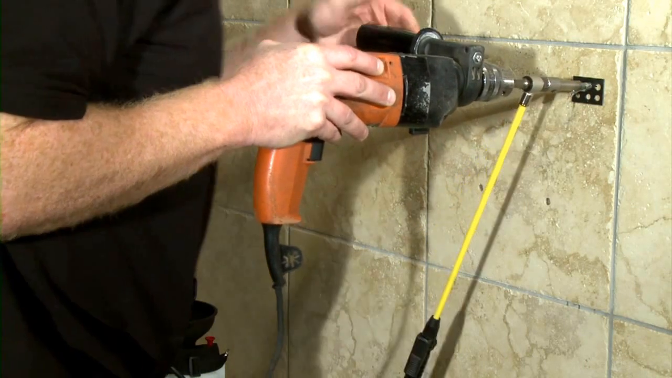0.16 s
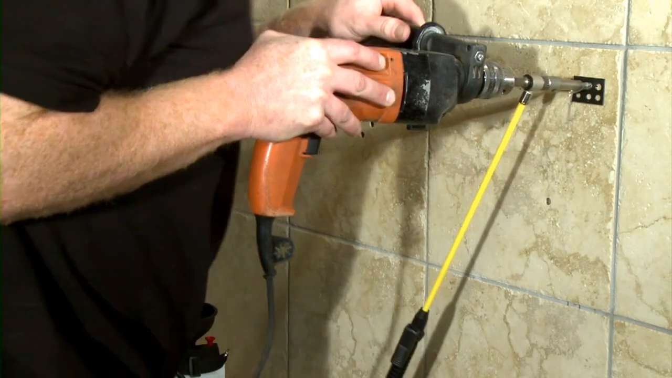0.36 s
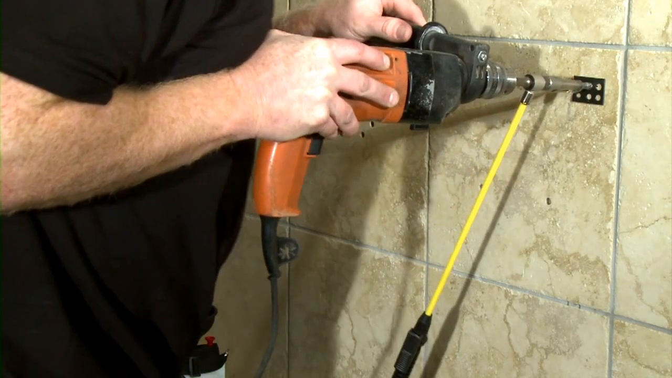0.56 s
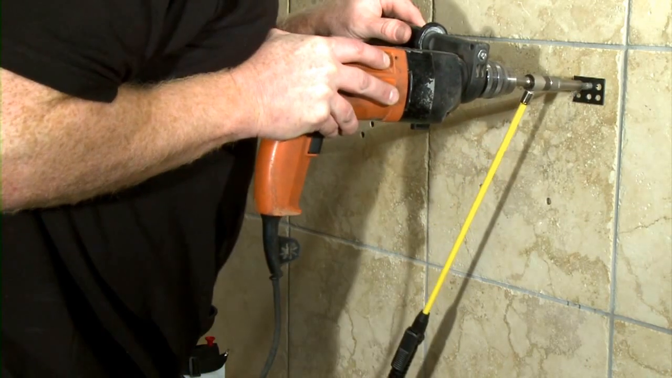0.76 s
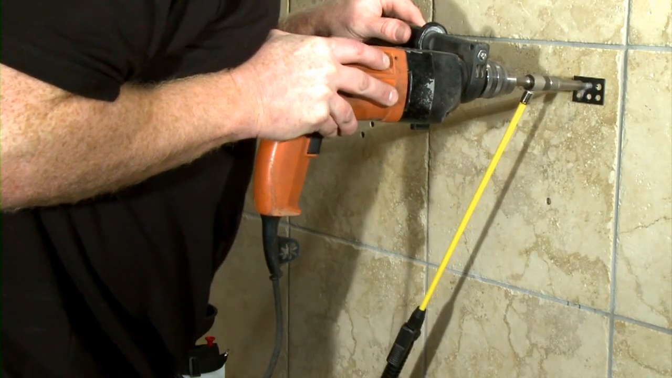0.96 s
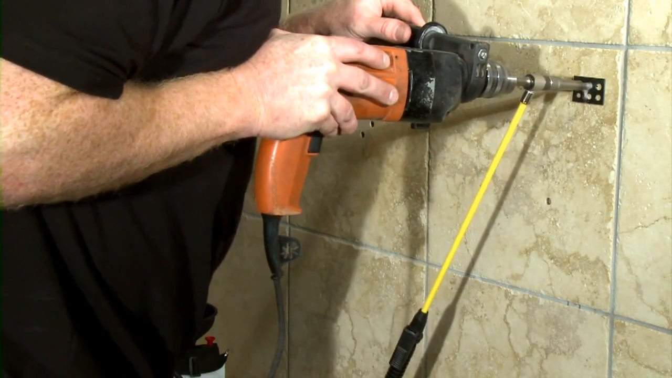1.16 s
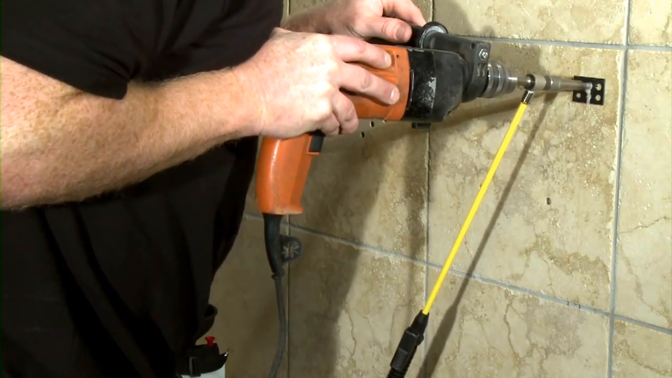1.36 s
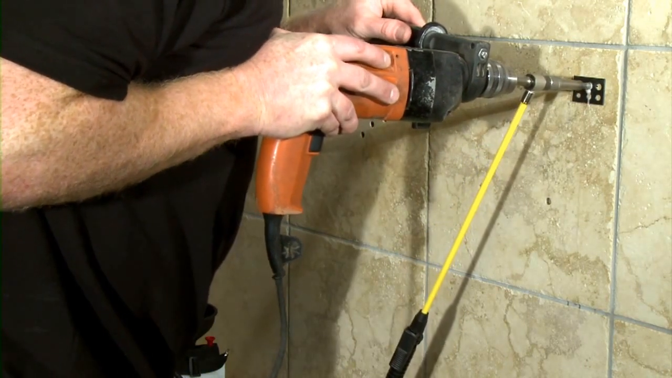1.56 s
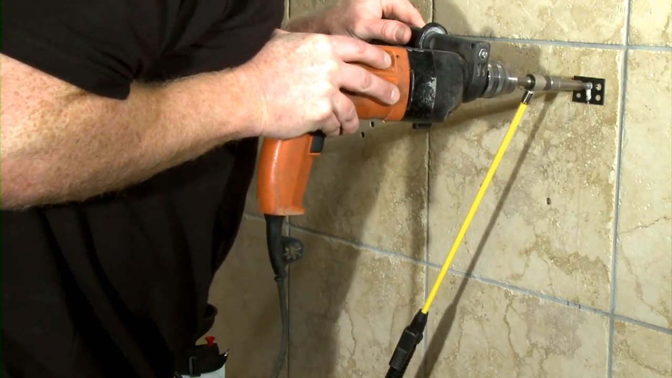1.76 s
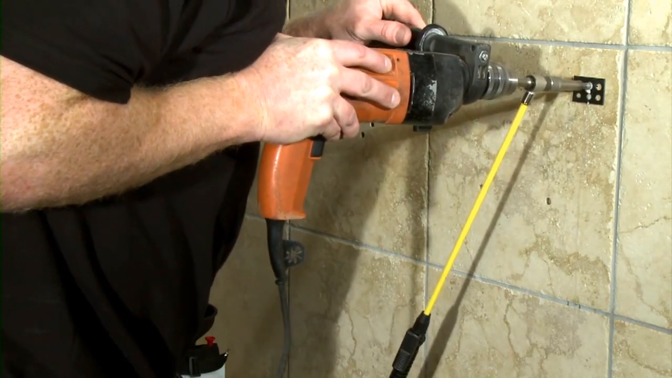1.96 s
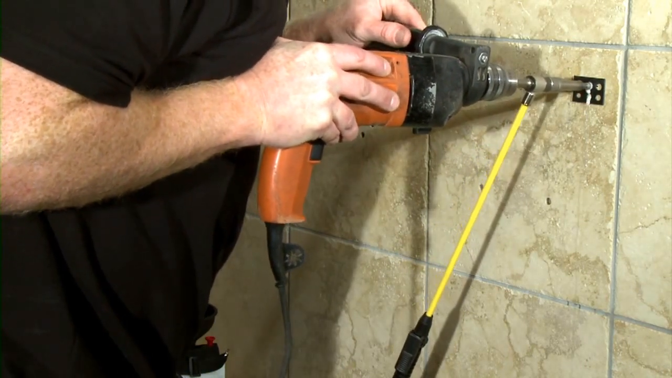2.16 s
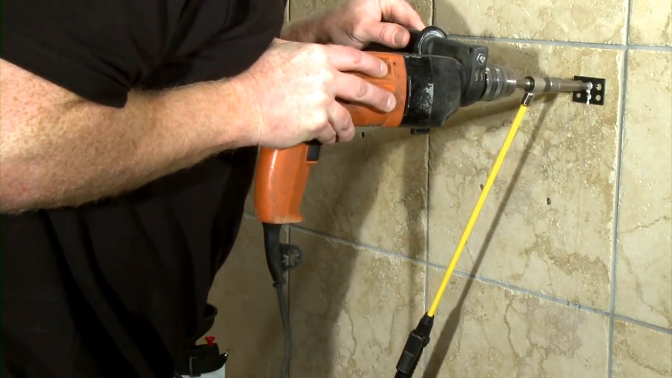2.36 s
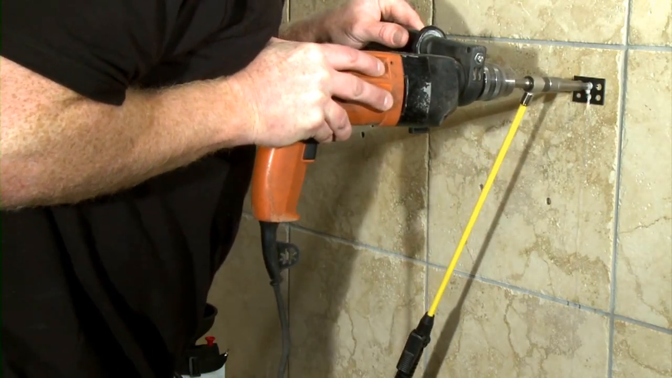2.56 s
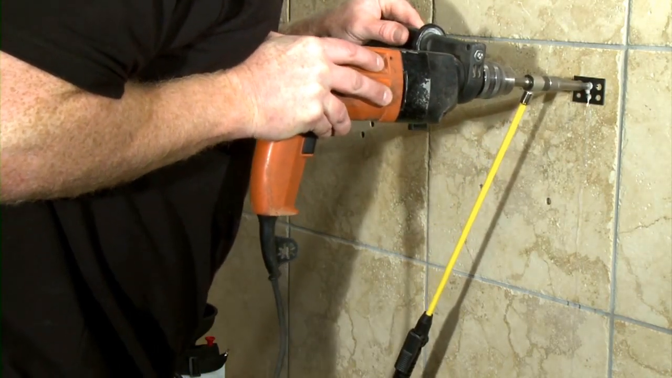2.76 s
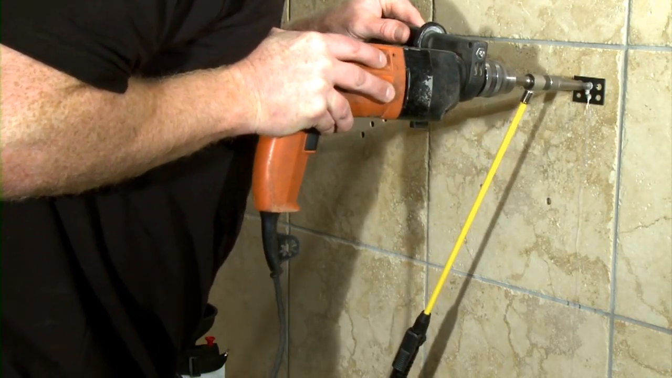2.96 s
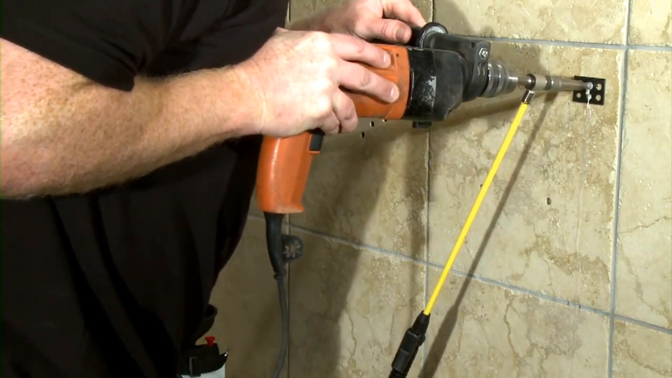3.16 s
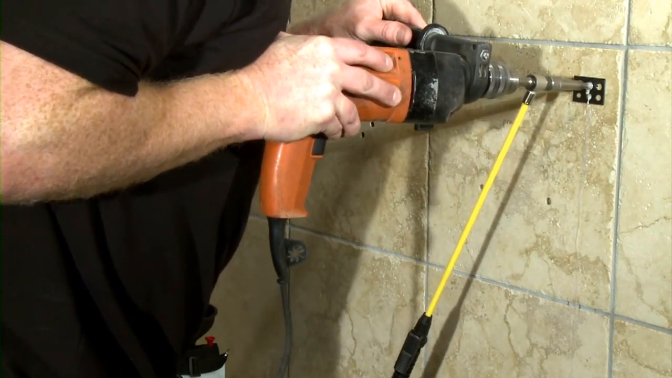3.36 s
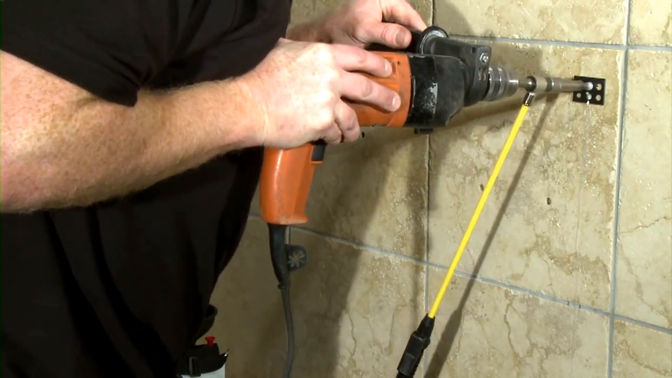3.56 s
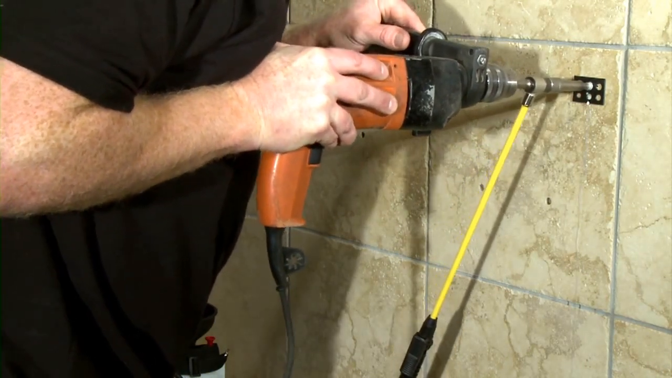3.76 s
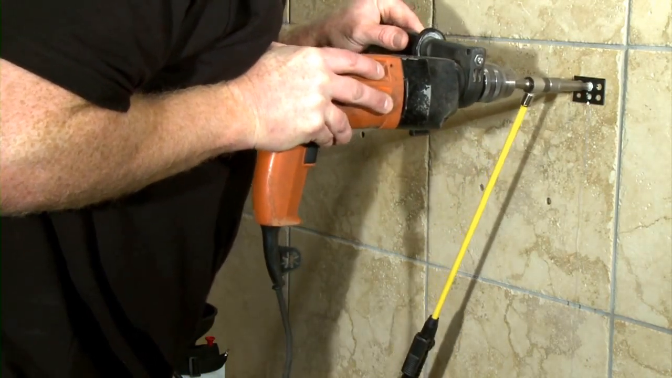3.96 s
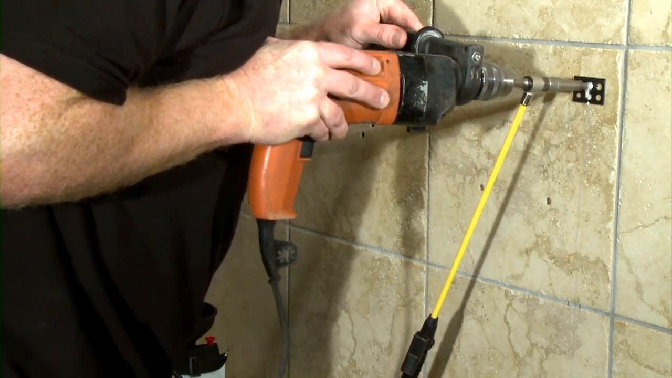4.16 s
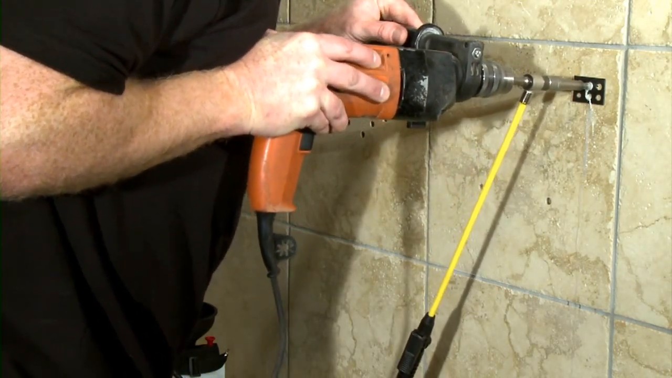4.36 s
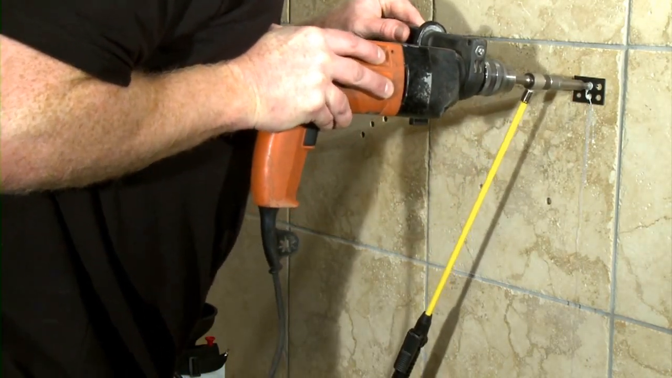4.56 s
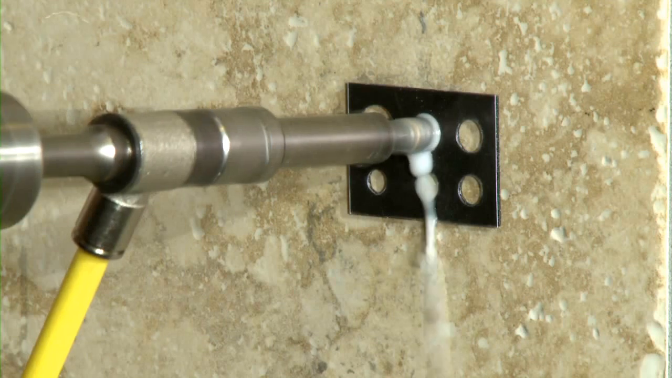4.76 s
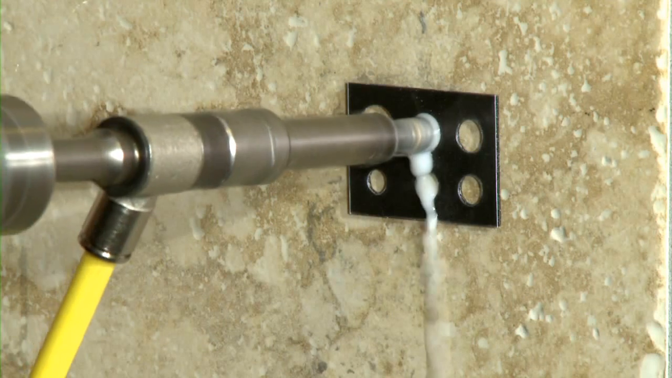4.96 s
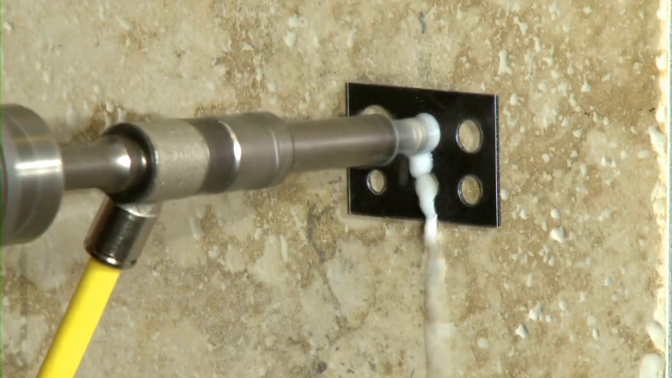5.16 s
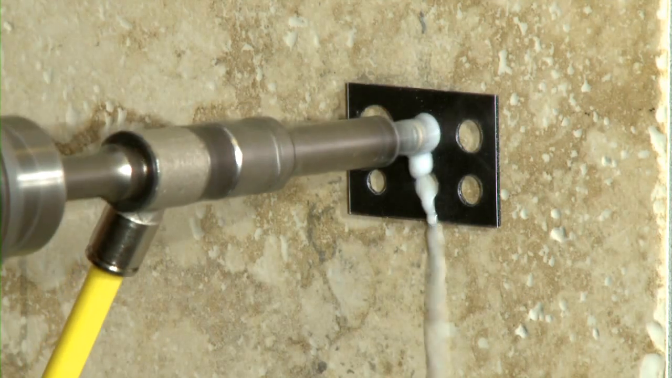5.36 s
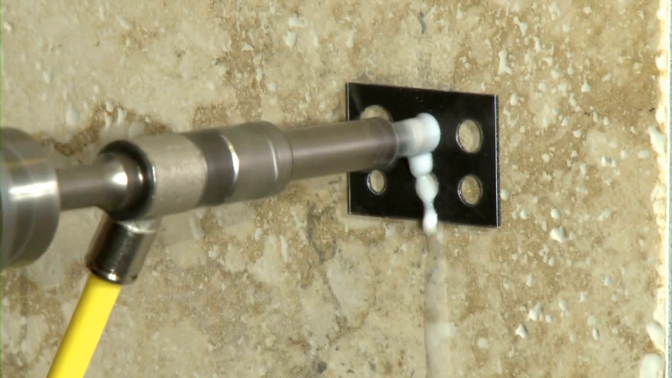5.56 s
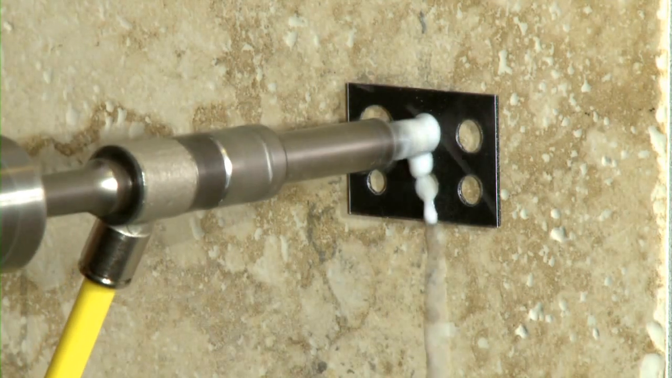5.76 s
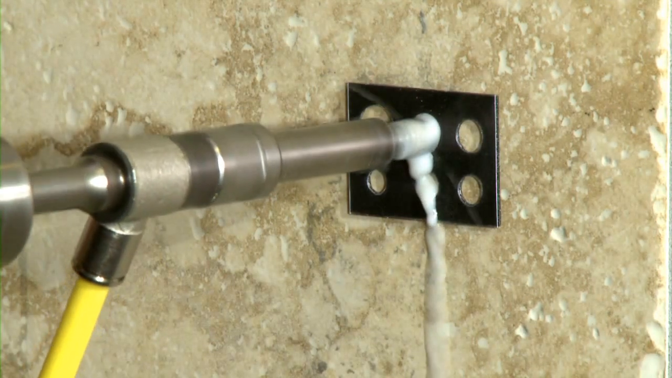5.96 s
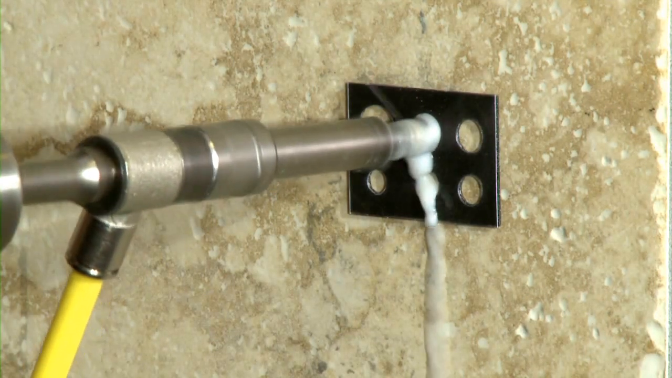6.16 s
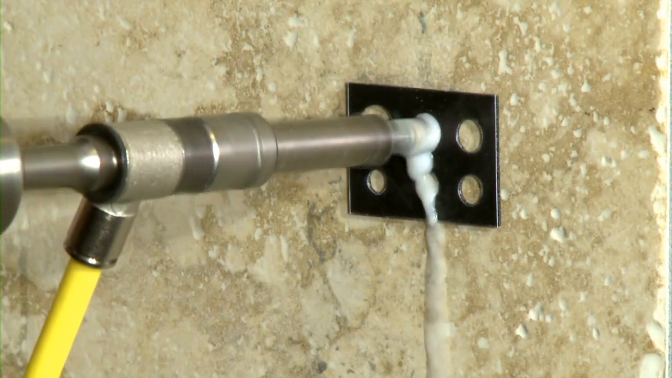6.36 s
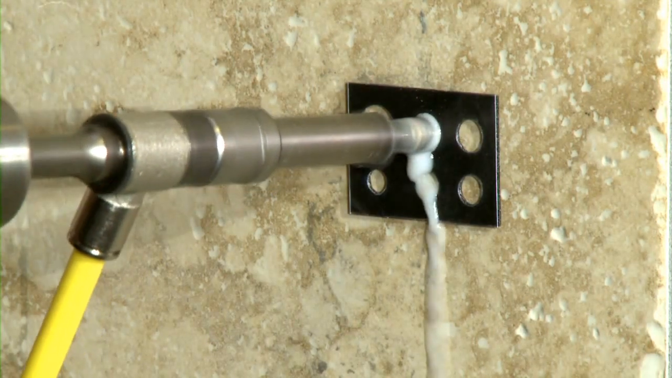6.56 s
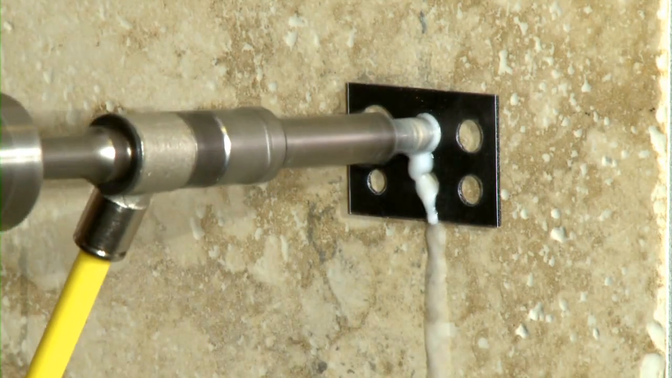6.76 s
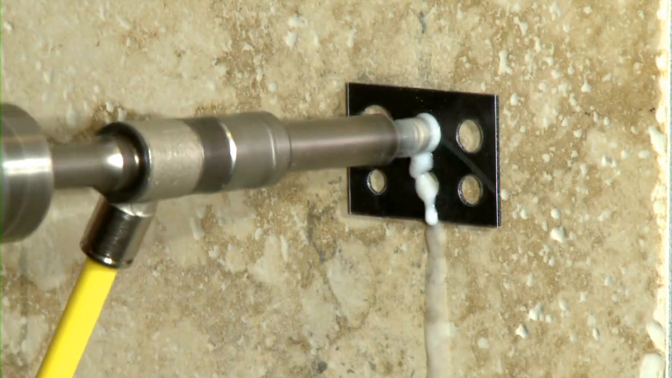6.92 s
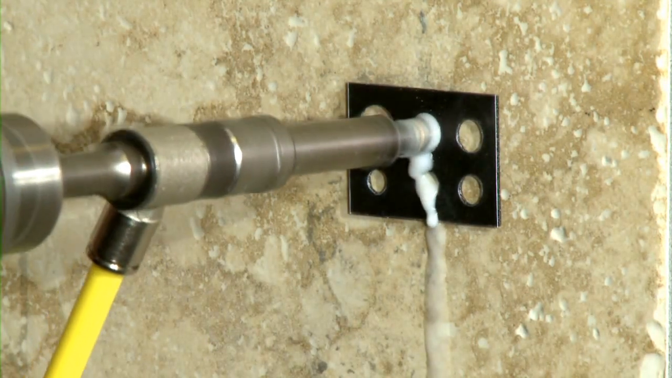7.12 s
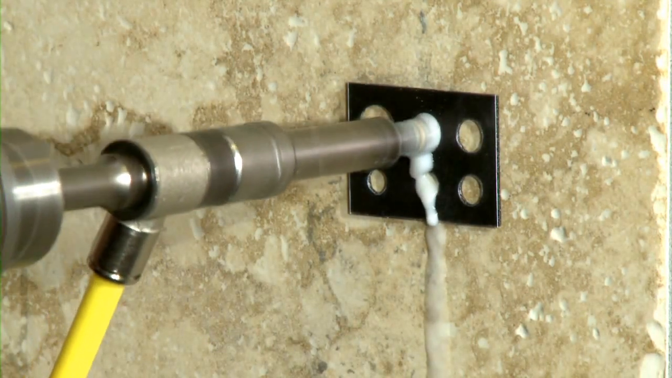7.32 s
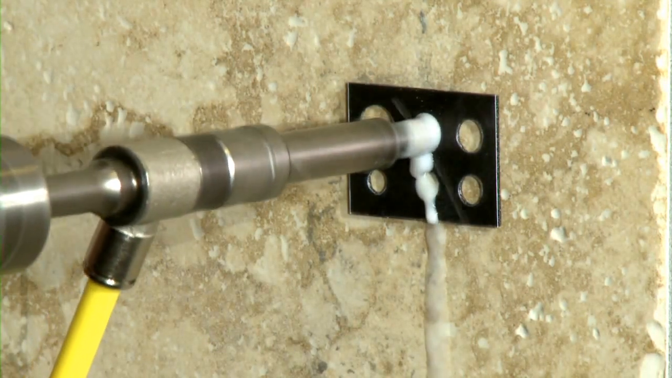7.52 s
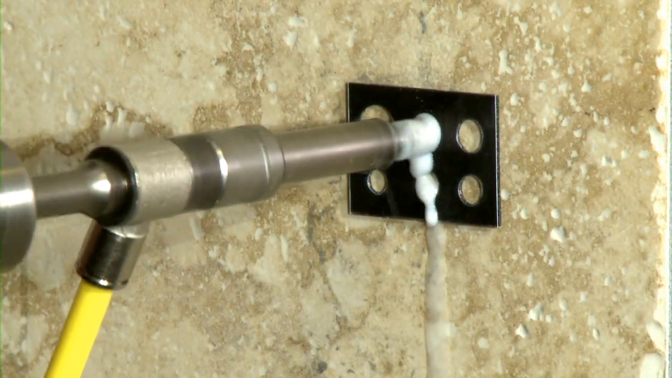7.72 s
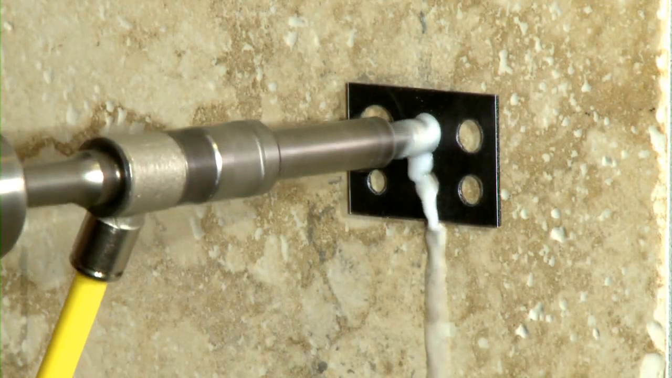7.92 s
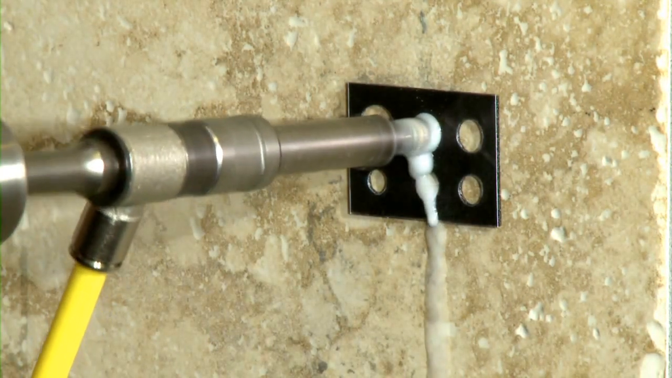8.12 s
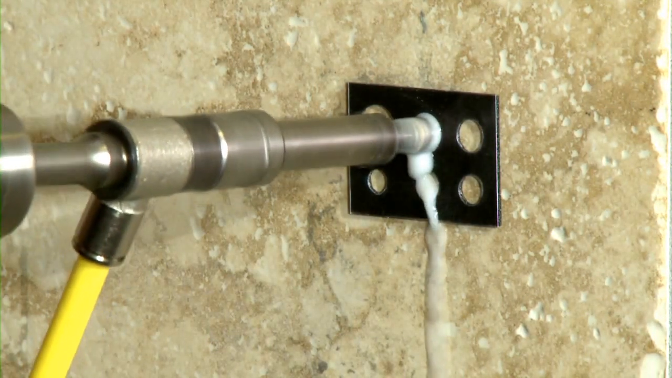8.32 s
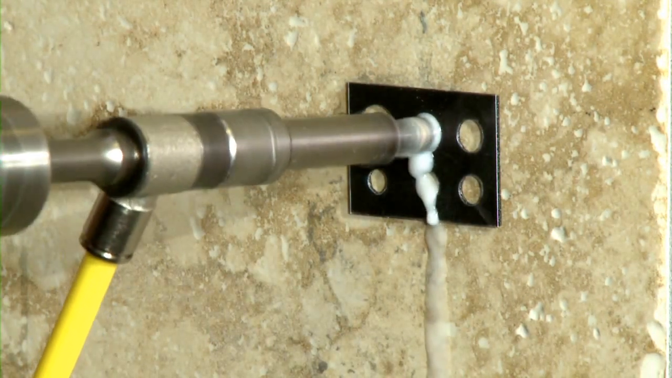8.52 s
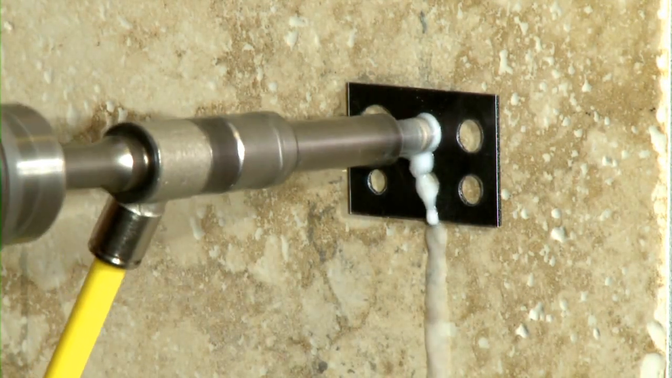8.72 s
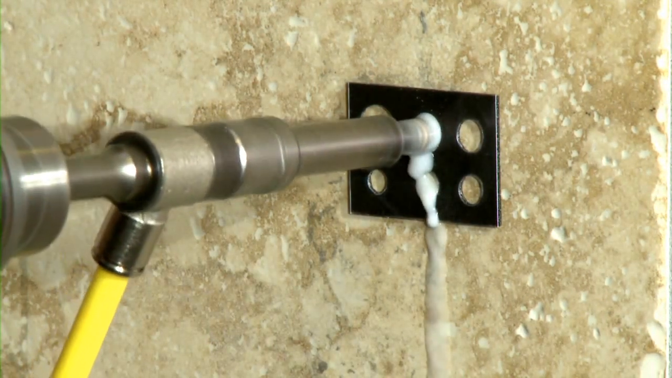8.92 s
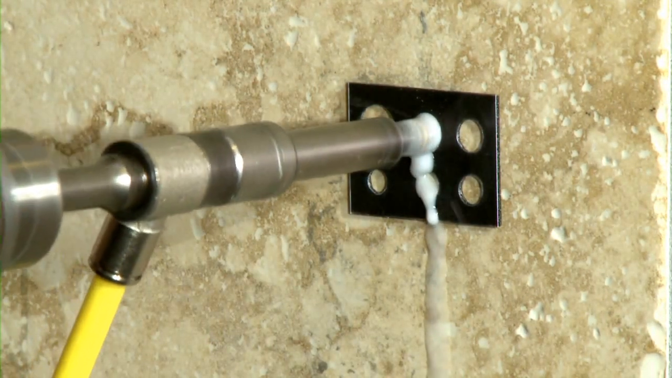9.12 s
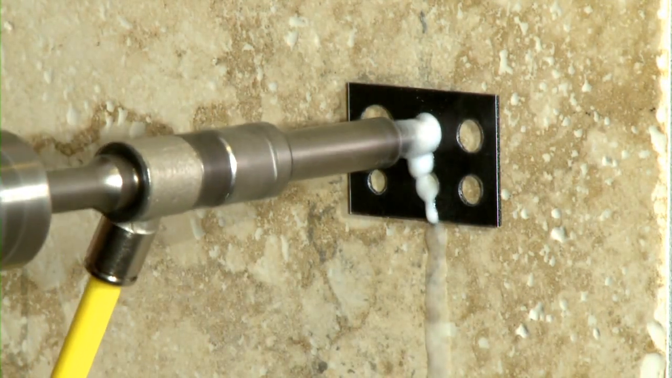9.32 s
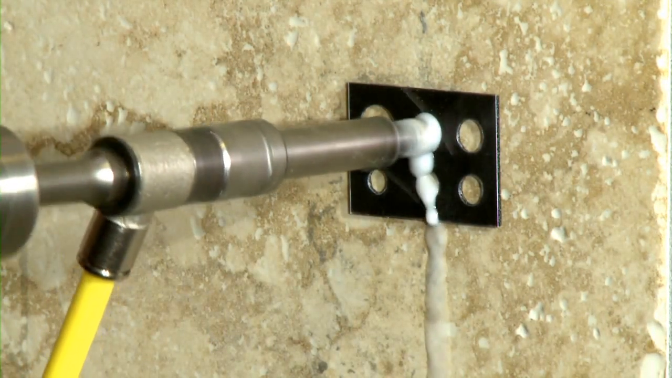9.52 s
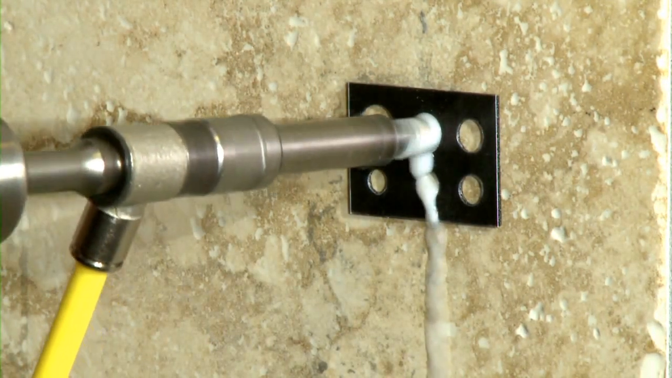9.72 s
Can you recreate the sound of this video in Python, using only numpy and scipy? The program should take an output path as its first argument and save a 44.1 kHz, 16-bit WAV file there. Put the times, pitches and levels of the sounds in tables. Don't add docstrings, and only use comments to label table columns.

```python
import sys
import numpy as np
from scipy import signal
from scipy.fft import rfft, irfft, next_fast_len
from scipy.io import wavfile
from scipy.ndimage import uniform_filter1d, map_coordinates

SR = 44100
rng = np.random.default_rng(int(sys.argv[2]) if len(sys.argv) > 2 else 0)


def wav_out(sig):
    wavfile.write(sys.argv[1], SR, np.round(np.clip(np.atleast_2d(sig).T, -1, 1) * 32767).astype(np.int16))


def makeup_ratio(level_db):
    decades = np.asarray(level_db, float) / 20
    return 10 ** decades


N = 436149

BLADES = 29
SPINDLE = 6 / 29
TRIGGER_S, FULL_SPEED = .64, 500


def unit(x):
    return x / np.sqrt(np.mean(x ** 2) + 1e-20)


def along(points, hz):
    f, v = np.transpose(points)
    return np.interp(np.log(hz + 1), np.log(f + 1), v)


def over_time(points):
    s, v = np.transpose(points)
    return np.interp(np.arange(N) / SR, s, v)


def wobble(rate):
    knots = rng.standard_normal(int(N * rate / SR) + 4)
    return map_coordinates(knots, [np.arange(N) * rate / SR])


def filtered(x, response):
    m = next_fast_len(N + 8192)
    return irfft(rfft(x, m) * response(np.fft.rfftfreq(m, 1 / SR)), m)[:N]


def bumps(modes, hz):
    return [(1 / (1 + (2 * (hz - c) / w) ** 2), db) for c, w, db in modes]


def running(start_s, fade_s=.014):
    return np.clip((np.arange(N) / SR - start_s) / fade_s, 0, 1)


def spin():
    # time in seconds, fan blade passes per second.
    run_up = [(0.62, 821.0), (0.7, 3100.0), (0.84, 4865.0), (1.2, 8956.0), (1.47, 11396.0), (1.65, 12185.0),
              (2.05, 13406.0), (2.55, 14222.0), (3.4, 14586.0), (4.0, 14540.0), (4.6, 14592.0),
              (5.2, 14530.0), (5.8, 14529.0), (6.2, 14492.0), (7.0, 14498.0), (7.8, 14465.0),
              (9.1, 14505.0), (9.89, 14535.0)]
    s, hz = np.transpose(run_up)
    slope = np.gradient(hz, s)
    place = np.interp(np.arange(N) / SR, s, np.arange(len(s)))
    i = np.minimum(place.astype(int), len(s) - 2)
    u = place - i
    bend = np.diff(s)[i] * u * (1 - u) * ((1 - u) * slope[i] - u * slope[i + 1])
    return (hz[i] + np.diff(hz)[i] * u * u * (3 - 2 * u) + bend) / BLADES


def whistle_db(speed):
    # peak time in seconds, level in dB, half length in seconds.
    swell_rows = [(1.042, -33, 0.11), (2.69, -26, .09), (3.073, -23.5, .09), (3.34, -27, 0.16),
                  (3.62, -31, .12), (3.87, -31, .12), (4.47, -33, .08), (4.67, -27, .08), (4.85, -29, .06),
                  (5.15, -24.5, .14), (5.42, -31, .07), (5.95, -22, 0.098), (6.2, -27, 0.18),
                  (6.68, -31, .12), (6.98, -31, .1), (7.25, -35, .08), (7.53, -22, .08), (7.77, -23, 0.12),
                  (8.117, -33, .14), (8.6, -31, .16), (8.93, -34, .05), (9.2, -23, .13), (9.42, -26, .12),
                  (9.88, -34, .07)]
    t = np.arange(N) / SR
    share = speed / FULL_SPEED
    climbing = np.clip((1 - share) * 30, 0, 1)
    gap_db = -42
    base = climbing * makeup_ratio(-30) * share ** 2.2 + (1 - climbing) * makeup_ratio(gap_db)
    swells = sum(makeup_ratio(db) * np.exp(-((t - s) / half) ** 2) for s, db, half in swell_rows)
    return 20 * np.log10(base + swells), climbing


def whine(turns, speed):
    # multiple of the turning speed, dB at full speed, power of speed by which
    # it grows, dB gained for each turn per second lost to load.
    strong = [(12 / 29, -59, 2, 0), (1, -39.5, 3.6, -1.8), (2, -54, 2, 0), (3, -35, 2.2, -1.1),
              (6, -37.5, 4, .9), (8, -36, 9, 0)]
    # multiple, dB at full speed, power of speed.
    weak = [(5, -53, 1), (6.414, -48, 4), (7, -41, 2), (7.414, -44, 8), (7.586, -40, 8), (8.586, -45, 4),
            (9.31, -36, 3), (12, -45, 1), (13, -46, 8), (18, -54, 4), (21, -55, 8), (23, -44, 8),
            (24, -53, 4), (26, -52, 2), (28, -53, 8), (30, -47, 3)]
    # multiple, centre in Hz, width in Hz, dB.
    crossed = [(1, 440, 50, 5), (1, 474, 18, -14), (2, 940, 110, 12), (3, 800, 300, -6), (3, 1140, 100, 2),
               (3, 1270, 50, -9)]
    bites_s, free_speed = 3.4, 503.2
    share = speed / FULL_SPEED

    def tone(k):
        return np.sqrt(2) * np.sin(2 * np.pi * (k * turns + rng.random()) + .2 * wobble(40))

    level_db, climbing = whistle_db(speed)
    level_db = level_db + 3.5 * climbing * wobble(14)
    side_lines = 1 + .12 * np.cos(2 * np.pi * SPINDLE * turns)
    out = makeup_ratio(level_db + 1.5 * wobble(30) + .8 * wobble(200)) * side_lines * tone(BLADES)
    out *= np.clip(speed / 60 - 2, 0, 1)
    sag = (free_speed - speed) * running(bites_s)
    for k, db, steep, load_db in strong:
        modes = [row[1:] for row in crossed if row[0] == k]
        boost_db = sum(w * mode_db for w, mode_db in bumps(modes, k * speed))
        level_db = db + boost_db + load_db * sag + .8 * wobble(2) + 1.2 * wobble(14)
        out += makeup_ratio(level_db) * share ** steep * tone(k)
    for k, db, steep in weak:
        out += makeup_ratio(db + 2 * wobble(5)) * share ** steep * tone(k)
    return out * running(TRIGGER_S)


def teeth(turns):
    # frequency in Hz, level in dB per Hz.
    tooth_color = [(600, -120), (1000, -14), (2400, -14), (3000, -4), (3900, 0), (4700, -3), (6000, -12),
                   (8000, -18), (12000, -120)]
    pattern = 29
    size = pattern * 64
    count = size // 2 + 1
    strength = makeup_ratio(np.clip(6 * rng.standard_normal(count), -20, 7))
    lines = np.exp(2j * np.pi * rng.random(count)) * strength
    place = (turns + .012 * wobble(12)) * size / pattern
    flaws = map_coordinates(irfft(lines), [place], mode="grid-wrap")
    return unit(filtered(flaws, lambda hz: makeup_ratio(along(tooth_color, hz))))


def roar(turns, speed):
    # dB at full speed, power of speed, share of full speed where it stops growing.
    work = [
        (-42, 1.4, 0.5),
        (-29.5, 1.67, 0.92),
        (-21.5, 1.83, 1),
        (-27, 2.9, 1),
    ]
    # frequency in Hz, level in dB per Hz.
    rumble_color = [(50, -22), (100, -13), (250, -3.5), (330, -7.5), (430, -4), (600, 2.5), (750, -9),
                    (1000, -11), (2000, -120)]
    drone_color = [(300, -120), (550, -18.5), (750, -2.5), (1100, -2.5), (1500, -1), (1900, -7.5),
                   (2300, -6.5), (3000, -1), (5000, -120)]
    grind_color = [(1000, -39), (1700, -17), (2100, -12), (2900, -5.5), (4000, -1.5), (4700, -2),
                   (5400, -3), (6500, -4.5), (7800, -7), (9000, -18.5), (11000, -22), (16000, -120)]
    air_color = [(2500, -120), (4500, -20), (6500, -6), (8500, -.5), (10000, -1), (13500, 0), (15000, -1.5),
                 (15800, -5)]
    # centre in Hz, width in Hz, boost in dB.
    housing = [(440, 60, 5), (1100, 130, 6), (1430, 150, 3), (1775, 70, 6), (2350, 120, 2), (2750, 200, 2),
               (3780, 250, 3), (4250, 250, 2), (4700, 220, 4), (5120, 150, 2), (5850, 300, 2),
               (6500, 250, 4), (7200, 500, 1.5), (8020, 150, 2), (9000, 300, 1.5), (10050, 450, 4.5)]
    # centre in Hz, width in Hz, level in dB.
    shell_modes = [(240, 160, 8), (430, 60, 6), (1680, 200, 7), (4680, 350, 5)]
    beat = (1 + .11 * np.cos(2 * np.pi * turns)) * (1 + .03 * np.cos(2 * np.pi * SPINDLE * turns))
    pulse = beat * makeup_ratio(0.26 * wobble(70) + 0.24 * wobble(400))

    def layer(color):
        def response(hz):
            body_db = sum(w * db for w, db in bumps(housing, hz))
            return makeup_ratio(along(color, hz)) * makeup_ratio(body_db)
        return unit(filtered(pulse * rng.standard_normal(N), response))

    share = speed / FULL_SPEED
    levels = []
    for db, steep, knee in work:
        growth_db = 20 * steep * np.log10(np.minimum(share / knee, 1))
        levels.append(db + growth_db + 0.34 * wobble(2.51))
    levels[2] += 5 * np.exp(-((share - 0.33) / 0.18) ** 2)
    colors = (rumble_color, drone_color, grind_color, air_color)
    noise = sum(makeup_ratio(db) * layer(color) for db, color in zip(levels, colors))

    treble = filtered(noise, lambda hz: 1 / (1 + (5300 / (hz + 1)) ** 12) / (1 + (hz / 8500) ** 12))
    noise -= treble * (1 - np.clip(speed / 340, 0, 1) ** 1.2)
    shell = filtered(noise, lambda hz: sum(w * makeup_ratio(db) for w, db in bumps(shell_modes, hz)))
    noise += shell * np.clip(1 - speed / 380, 0, 1) * np.clip(speed / 60 - 1, 0, 1)
    return running(TRIGGER_S, fade_s=.02) * (noise + makeup_ratio(levels[2] - 9) * teeth(turns))


def rattle(turns, speed):
    # multiple of the turning speed, level in dB, turns per second where it is loudest,
    # width in turns per second.
    rattle_rows = [(11.8, -43, 245, 65), (17.4, -39, 225, 35), (23.6, -45, 175, 45), (1.44, -47, 390, 60),
                   (7, -47, 235, 50), (1.44, -50, 290, 20)]
    out = np.zeros(N)
    for k, db, loudest, width in rattle_rows:
        swell = makeup_ratio(db + 1.5 + 3 * wobble(40)) * np.exp(-((speed - loudest) / width) ** 2)
        out += swell * np.sqrt(2) * np.sin(2 * np.pi * k * turns + 1.3 * wobble(130))
    return out * running(TRIGGER_S)


def hand():
    # time in seconds, level in dB.
    slide = [(.22, -75), (.24, -60), (.3, -61), (.36, -61), (.45, -66), (.55, -68), (.63, -70), (.68, -78)]
    # centre in Hz, width in Hz, level in dB.
    squeaks = [(1210, 25, 2), (2620, 70, 1), (3600, 900, -10), (5000, 200, -7), (5700, 600, -16),
               (6900, 500, -13), (8300, 500, -24), (12200, 500, -29)]
    # time in seconds, peak in dB, ringing body in dB.
    ticks = [
        (.335, -66, -12),
        (.39, -70, -12),
        (.447, -70, -12),
        (.47, -64, -12),
        (.5, -66, -12),
        (.543, -68, -12),
        (.611, -61, -10),
        (.6452, -45, 1),
    ]

    def color(hz):
        hiss = makeup_ratio(-16) * (4000 / (hz + 4000)) ** 2 * (hz > 1500)
        return sum(makeup_ratio(db) * w for w, db in bumps(squeaks, hz)) + hiss

    out = makeup_ratio(over_time(slide) + 1.8 * wobble(59)) * unit(filtered(rng.standard_normal(N), color))
    out *= running(slide[0][0]) * (np.arange(N) < slide[-1][0] * SR)
    t = np.arange(SR // 10) / SR
    for s, db, body_db in ticks:
        fall = makeup_ratio(-60 * t / .012) + makeup_ratio(-14 - 60 * t / .12)
        snap = signal.lfilter([1, .4], 1, rng.standard_normal(len(t))) * fall
        snap = snap - uniform_filter1d(snap, size=28)
        ring = np.sin(2 * np.pi * 3600 * t) * makeup_ratio(-60 * t / .008)
        out[round(s * SR):][:len(t)] += makeup_ratio(db) * (snap + makeup_ratio(body_db + 3) * ring)
    return out


def tiles(x):
    t = np.arange(SR // 2) / SR
    tail = rng.standard_normal(len(t)) * makeup_ratio(-60 * t / .35) * (t > .004)
    echo = signal.fftconvolve(x, tail / np.linalg.norm(tail))[:N]
    return (x + makeup_ratio(-11) * echo) / np.hypot(1, makeup_ratio(-11))


def room_tone():
    # frequency in Hz, level in dB per Hz.
    quiet_color = [(12, -29), (26, 1.5), (40, -9), (62, -1.5), (101, -4), (129, -7.5), (202, -8.5),
                   (300, -16), (450, -14.5), (906, -21), (1380, -25), (2680, -28), (7000, -44),
                   (15500, -60)]
    # frequency in Hz, rms level in dB.
    hum = [
        (27, -61.5),
        (100, -65),
    ]
    # time in seconds, level in dB.
    buzz = [(.62, -90), (.68, -49), (.95, -53), (1.4, -59), (2, -59.5), (9.89, -71)]
    # time in seconds, level in dB, pitch in Hz.
    thumps = [
        (3.05, -39, 68),
        (4.1, -39, 208.4),
        (6.17, -36.5, 132.6),
        (7.08, -40, 172),
        (8.42, -48, 100),
    ]
    t = np.arange(N) / SR
    air = unit(filtered(rng.standard_normal(N), lambda hz: makeup_ratio(along(quiet_color, hz))))
    out = makeup_ratio(-50.5 + 0.41 * wobble(3.6)) * air
    for hz, db in hum:
        out += makeup_ratio(db + 1.5 * wobble(4)) * np.sqrt(2) * np.sin(2 * np.pi * hz * t + .8 * wobble(3))
    out += makeup_ratio(over_time(buzz)) * np.sqrt(2) * np.sin(2 * np.pi * 100 * t)
    for s, db, hz in thumps:
        u = np.clip(t - s, 0, None)
        out += makeup_ratio(db - 60 * u / 0.7) * (1 - np.exp(-u / .03)) * np.sin(2 * np.pi * hz * u)
    return out


def scene():
    speed = spin()
    turns = np.cumsum(speed) / SR
    in_room = tiles(roar(turns, speed) + rattle(turns, speed) + hand())
    mono = whine(turns, speed) + in_room + room_tone()
    return np.array([mono, mono])


def masked(x):
    # band in Hz, level in dB.
    limits = [(13000, -12), (14700, -22), (15100, -25), (15350, -29), (15700, -32)]
    speed = spin()
    hz, t, z = signal.stft(x, SR, nperseg=2048)
    at = np.minimum(t * SR, N - 1).astype(int)
    chance = np.repeat(rng.standard_normal((len(hz) // 8 + 1, len(t))), 8, axis=0)
    chance = chance[:len(hz), np.arange(len(t)) // 2]
    band_hz = (hz // 172 * 172)[:, None]
    lost = whistle_db(speed)[0][at] + 2.6 * chance > along(limits, band_hz)
    lost &= abs(band_hz + 86 - BLADES * speed[at]) > 190
    return signal.istft(z * ~lost, SR, nperseg=2048)[1][:N]


def split_bands(mono):
    out, frame, count, wide_hz = np.array([mono, mono]), 2048, 40, 1900
    hz, fade = np.fft.rfftfreq(frame, 1 / SR), np.hanning(frame) ** 2
    for when, where in zip(rng.uniform(SR, N - frame, count), rng.standard_normal(count)):
        at = round(when)
        lo_hz = max(8700 * np.exp(.3 * where), 5000) - wide_hz / 2
        inside = (hz > lo_hz) * (hz < lo_hz + wide_hz)
        earlier = irfft(rfft(mono[at - frame:at]) * inside)
        present = irfft(rfft(mono[at:at + frame]) * inside)
        out[1, at:at + frame] += fade * (earlier - present)
    return out


def roll_off(x):
    return signal.sosfilt(signal.butter(12, 16170, fs=SR, output="sos"), x)


def record(dry):
    mono = filtered(dry[0], lambda hz: np.clip((15790 - hz) / 60, 0, 1) ** 2)
    mix = split_bands(masked(mono))
    return roll_off(mix)


dry = scene()
out = record(dry)
wav_out(out)
```